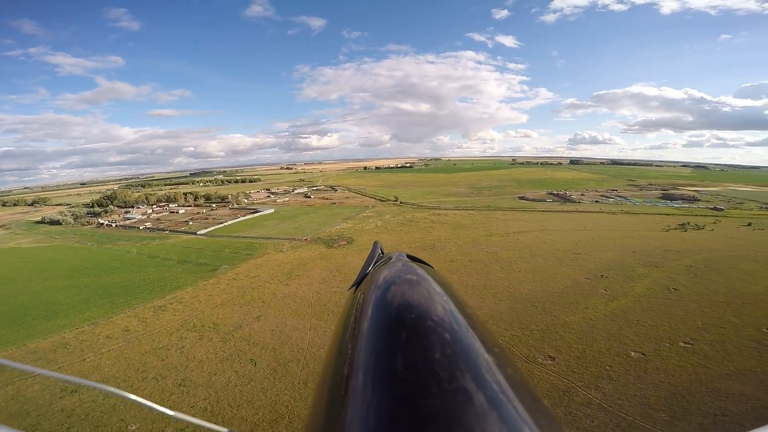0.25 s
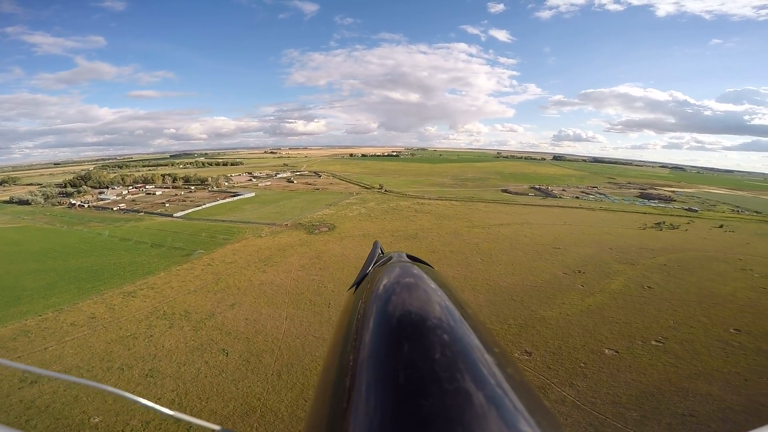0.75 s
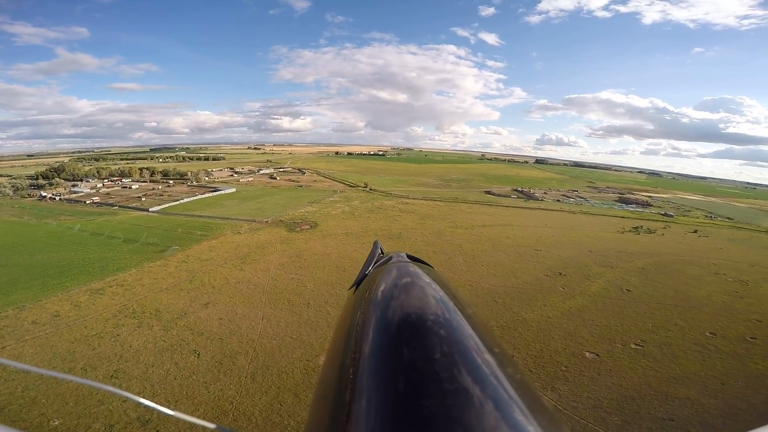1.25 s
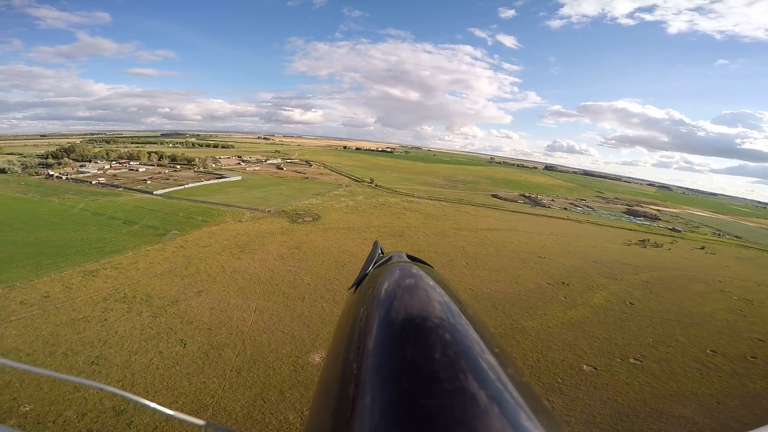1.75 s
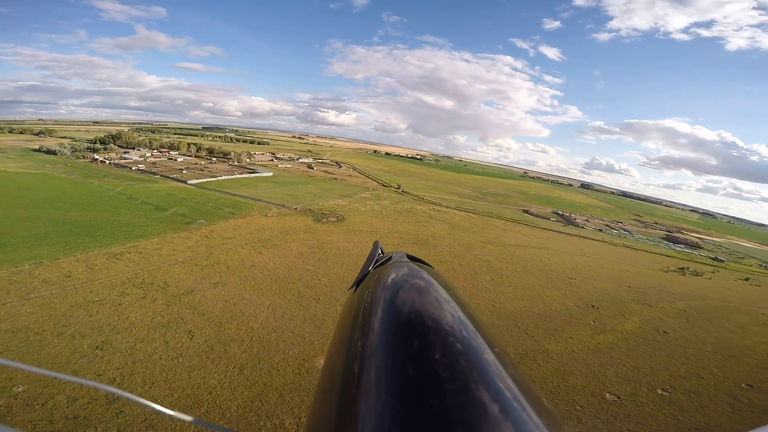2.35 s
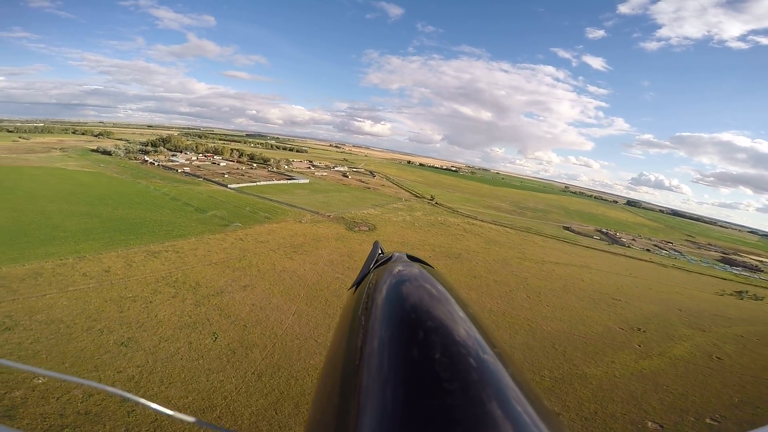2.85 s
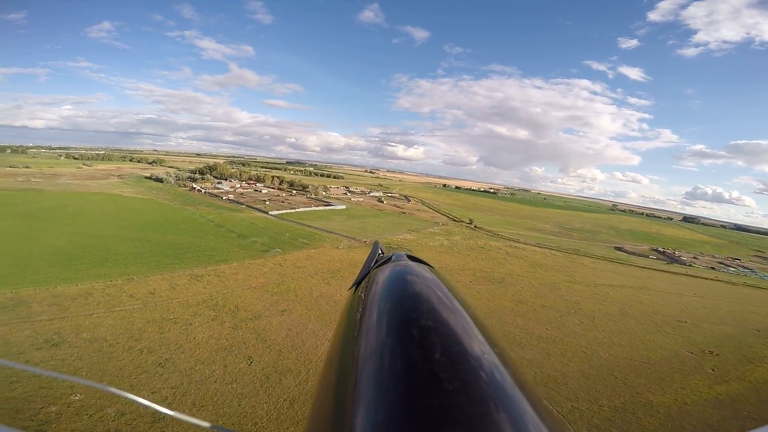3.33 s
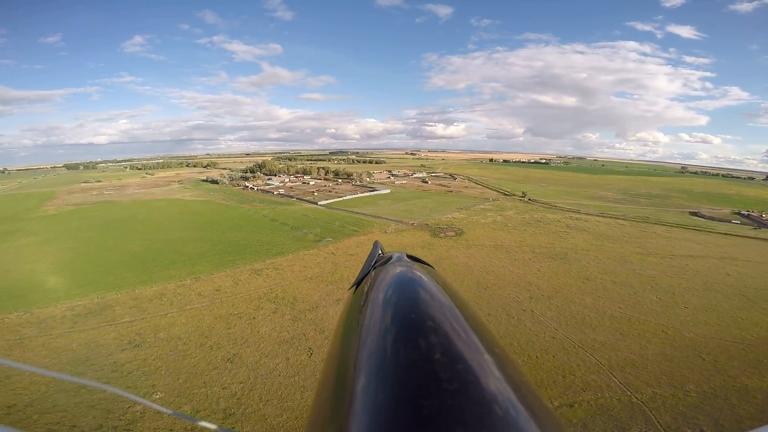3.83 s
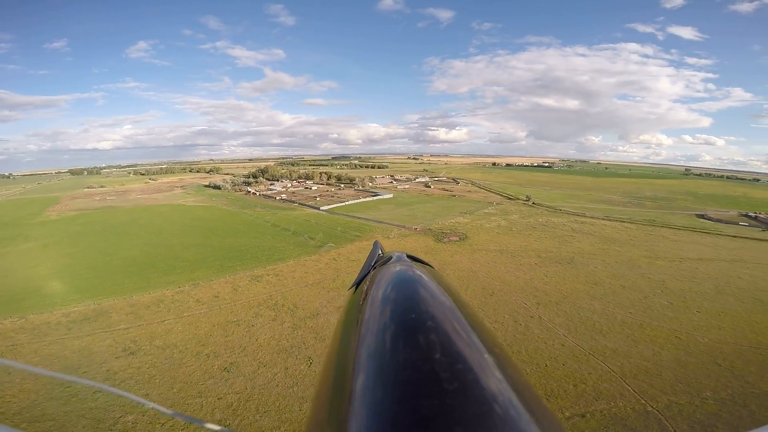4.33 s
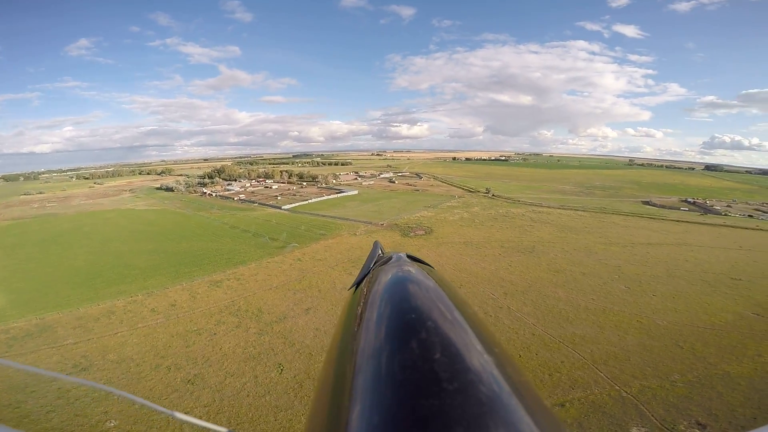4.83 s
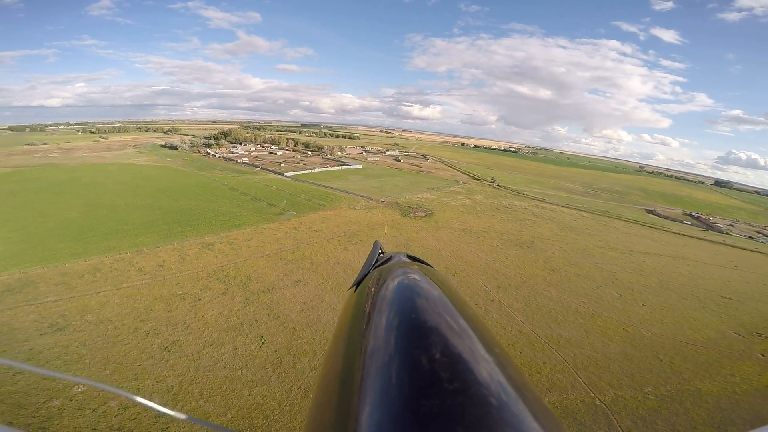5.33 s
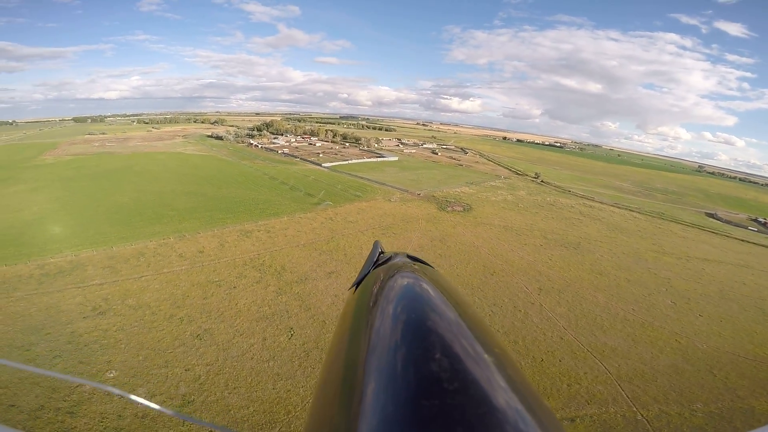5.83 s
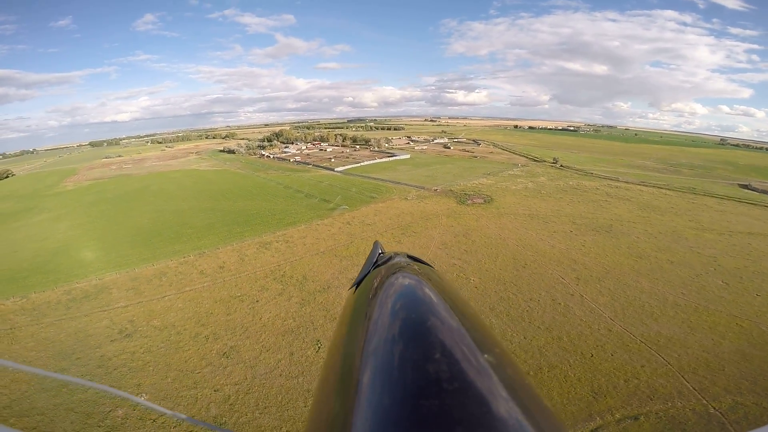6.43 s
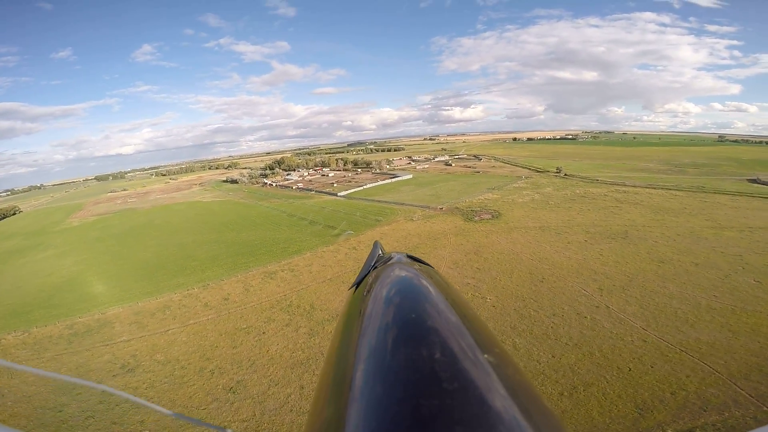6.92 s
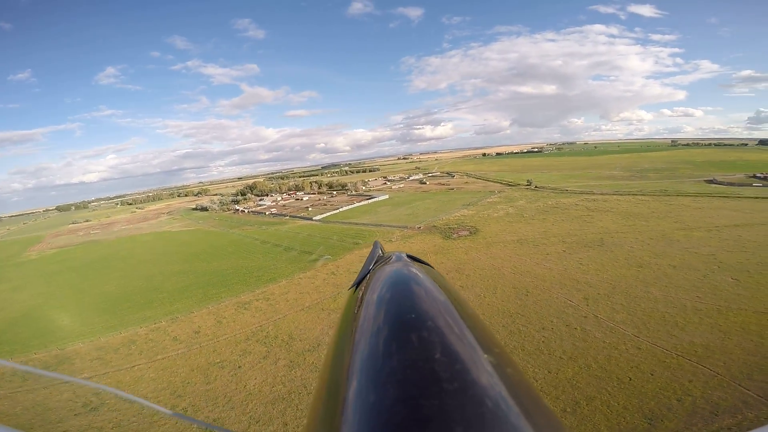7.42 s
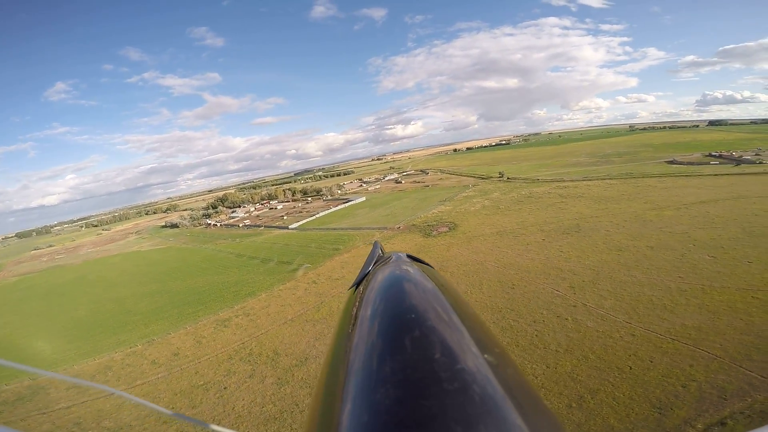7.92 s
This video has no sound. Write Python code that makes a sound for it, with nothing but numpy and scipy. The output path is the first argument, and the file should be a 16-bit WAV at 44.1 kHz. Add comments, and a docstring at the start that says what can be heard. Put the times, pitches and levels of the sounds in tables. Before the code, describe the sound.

Lurching low rumble and gusty air roar against a camera on a flying model aircraft, with fast fluttering rattles, sharp knocks and steady electric whine.

```python
"""A camera rides on a small model plane flying over fields. From the start a deep rumble shudders, lurches and
lulls, filtered noise makes the rush of air, and sines whine. Gusts of noise soon break in, and in spells the
propeller chops the flow into a fast rattle. From 0.3 s the listed eddies and a few sharp blade slaps pop on the
case as short noise bursts, with small ones at random moments throughout. The rush strengthens near 3 s, sinks
near 4 s, then grows again and is strongest at the end."""
import sys
import numpy as np
from scipy import signal
from scipy.fft import rfft, irfft
from scipy.io import wavfile

SR = 44100
rng = np.random.default_rng(int(sys.argv[2]) if len(sys.argv) > 2 else 0)


def materialize(psi):
    """Save the field psi as 16-bit PCM at rate SR to the path in sys.argv[1].

    A 1-D psi becomes a single channel; in a 2-D psi each row is a channel.
    """
    bounded = np.clip(np.atleast_2d(psi).T, -1, 1)
    quanta = np.round(bounded * 32767).astype(np.int16)
    wavfile.write(sys.argv[1], SR, quanta)


N = 360297  # length in samples
T = np.arange(N) / SR  # time in seconds
HZ = np.fft.rfftfreq(N, 1 / SR)  # every frequency of the spectrum


def amp(db):
    """Turns decibels into gain."""
    return 10 ** (np.asarray(db) / 20)


def evened(x):
    """Scales a signal to rms 1."""
    return x / np.sqrt(np.mean(np.abs(x) ** 2) + 1e-20)


def curve(rows):
    """Joins the (time, value) points of a table with straight lines."""
    s, values = np.transpose(rows)
    return np.interp(T, s, values)


def colour(points):
    """Joins the (pitch, level) points of a table into a level in dB at every frequency."""
    hz, db = np.transpose(points)
    return np.interp(np.log(HZ + 1), np.log(hz + 1), db)


def filtered(x, db):
    """Causal filter with the given gain in dB: resonances ring after a blow, never before."""
    log_gain = irfft(np.log(amp(np.maximum(db, -110))), N)
    # fold the second half onto the first, so that nothing sounds ahead of its cause
    log_gain[1:N // 2] *= 2
    log_gain[N // 2 + 1:] = 0
    return irfft(rfft(x, N) * np.exp(rfft(log_gain)), N)


def noise(db):
    """Noise of rms 1 with the given spectrum in dB."""
    return evened(irfft(rfft(rng.standard_normal(N)) * amp(db), N))


def wander(rate_hz):
    """Smooth random movement of rms 1, mostly slower than the given rate."""
    return noise(-10 * (HZ / rate_hz) ** 2)


def band(x, lo_hz, hi_hz):
    """Keeps the part of x between two soft edges."""
    below_high_edge = 1 / (1 + (HZ / hi_hz) ** 10)
    below_low_edge = 1 / (1 + (HZ / lo_hz) ** 10)
    return irfft(rfft(x) * (below_high_edge - below_low_edge), N)


def swell(t, s, length, edge=2):
    """A smooth rise and fall of height 1 around the moment s; a higher edge makes its flanks steeper."""
    return np.exp(-np.minimum(np.abs(2.05 * (t - s) / length), 10) ** edge)


# smooth airflow over the case: (start_s, base_level_db)
AIRSPEED = [(0, -41.5), (2.1, -40.5), (3.0, -35), (4.25, -42), (6.1, -38), (6.6, -33.5), (7.1, -33.5),
            (7.6, -36.5), (8.17, -33)]
# lurches that shake the airframe hard: (middle_s, length_s, rise_db)
LURCHES = [(0.884, 0.15, 2), (1.452, 0.026, 17.5), (1.54, 0.028, 9.5), (2.062, 0.049, 5), (2.33, .16, 5.5),
           (3.143, 0.056, 7), (3.519, .08, 5), (4.05, 0.042, 9), (4.441, 0.098, 0.5), (5.23, 0.043, 9.5),
           (5.589, 0.17, 6), (6.045, 0.13, 7.5), (6.362, 0.062, 9.5), (6.807, 0.41, 4.5), (7.228, 0.13, 3),
           (7.573, 0.34, 4.5), (7.966, 0.27, 4.5)]
# lulls in which the shaking dies down: (middle_s, length_s)
LULLS = [(0.007, .1), (0.673, 0.073), (1.133, 0.16), (1.859, 0.1), (2.13, 0.046), (2.591, 0.054),
         (3.013, 0.13), (3.964, 0.077), (4.192, .08), (4.637, 0.066), (5.07, 0.028), (5.476, .04),
         (6.168, 0.09), (7.06, 0.044)]


def shaking(base_db=-18.5, growth=0.19, swing_db=-2.4, swing_hz=24, lull_db=-14.5):
    """Level of the airframe's shaking in dB: it grows with airspeed, wanders, lurches and lulls."""
    speed_db = curve(AIRSPEED)
    faster_db = growth * (speed_db - speed_db.mean())  # growth is dB of shaking per dB of rush
    lurches = sum(db * swell(T, s, length) for s, length, db in LURCHES)
    lulls = lull_db * sum(swell(T, s, length) for s, length in LULLS)
    return base_db + faster_db + swing_db * wander(swing_hz) + lurches + lulls


# colour of broad pressure swings: (pitch_hz, relative_level_db)
BUFFET_COLOUR = [(7, -36), (20, 3.5), (38, 3.5), (44, -12), (74, 9.5), (89, 0), (101, 2), (138, -14),
                 (158, -12.5), (197, -27.5), (300, -35), (450, -40), (900, -72.5)]


def rumble(mode_hz=58.3, width_hz=14, steadiness=0.66, low_hz=44, high_hz=75, mode_db=-0.03,
           buffet_db=-27, follow=0.2):
    """Turbulence shakes one deep mode of the airframe; broad pressure swings rise with it."""
    shake_db = shaking()
    mode = noise(-10 * np.log10(1 + (2 * (HZ - mode_hz) / width_hz) ** 4))
    swing = evened(signal.hilbert(mode))
    # the mode's own random swells are partly evened out
    steadied = swing.real / (np.abs(swing) ** 2 + 0.26) ** (steadiness / 2)
    push = amp(shake_db + mode_db) * evened(steadied)
    # the airframe needs a few cycles to swell and die
    shudder = push.std() * evened(band(push, low_hz, high_hz))
    buffet = noise(colour(BUFFET_COLOUR)) * amp(follow * (shake_db - shake_db.mean()))
    return shudder + amp(buffet_db) * buffet


# low blast in the turbulence, before trim: (start_s, level_relative_to_body_db)
BLAST = [(0, -9), (.3, -9.5), (.8, -6), (2.0, -12), (2.75, -11.5), (3.1, -6), (3.8, -1.5), (4.6, 0.5),
         (4.75, -12.5), (5.4, -2), (6.9, -1.5), (8.17, -5)]
# gusts that tear the flow off the case, before trim:
# (middle_s, length_s, strength_db, high_hiss_relative_to_strength_db)
GUSTS = [(0.018, 0.037, -23.5, -14.5), (0.204, 0.14, -33, -23), (0.379, 0.062, -22, -18),
         (.612, 0.062, -26, -12), (.692, .05, -27, -14), (0.778, .046, -28, -27), (1.041, .06, -23, -21),
         (1.145, 0.037, -26.5, -16.5), (1.382, .06, -27, -12.5), (1.661, 0.066, -29.5, -17.5),
         (1.879, 0.065, -29.5, -22.5), (1.973, 0.051, -30.5, -20), (2.241, .05, -27, -13.5),
         (2.496, 0.093, -24.5, -21), (2.778, 0.032, -22, -11.5), (2.886, 0.067, -27, -20),
         (3.108, 0.086, -24.5, -20), (3.267, 0.059, -21, -15.5), (3.394, 0.097, -31.5, -15.5),
         (3.607, 0.055, -21.5, -20.5), (3.82, 0.22, -34, -21), (3.96, 0.093, -34.5, -11.5),
         (4.073, 0.063, -26.5, -16.5), (4.395, 0.05, -35.5, -12.5), (4.484, 0.048, -30.5, -12.5),
         (4.667, 0.1, -30, -20), (4.719, 0.053, -23, -19.5), (5.368, 0.034, -26.5, -18),
         (5.451, 0.099, -29, -16.5), (5.592, 0.087, -32, -16), (5.693, 0.057, -30, -15.5),
         (5.952, 0.085, -26.5, -16), (6.168, 0.06, -26, -15.5), (6.289, 0.041, -24.5, -17),
         (6.444, 0.057, -26.5, -23), (6.585, 0.064, -34.5, -12), (6.715, 0.05, -28, -14.5),
         (6.895, 0.06, -26, -14), (7.139, .075, -31, -10.5), (7.34, 0.041, -31, -16),
         (7.534, .067, -34.5, -16), (7.855, 0.13, -32.5, -14.5)]


def gust_levels(churn_db=-9.5, churn_swing_db=5.5, churn_hz=3.7, churn_hiss_db=-14, hiss_growth=0.55):
    """Strength over time of the gusts' low blast, body and high hiss, with random weak churning between."""
    speed_db = curve(AIRSPEED)
    t = T[::64]  # a coarse clock is enough for slow changes
    churn = amp(speed_db + churn_db + churn_swing_db * wander(churn_hz))
    body = churn[::64] ** 2
    faster_db = np.interp(t, T, speed_db - speed_db.mean())
    hiss = body * amp(churn_hiss_db + hiss_growth * faster_db) ** 2
    for s, length, db, hiss_db in GUSTS:
        power = swell(t, s, length, edge=2.76) * amp(db) ** 2
        body = body + power
        hiss = hiss + power * amp(hiss_db) ** 2
    body = np.interp(T, t, np.sqrt(body))
    hiss = np.interp(T, t, np.sqrt(hiss))
    return amp(curve(BLAST)) * body, body, hiss


def boom(boom_db=-48, growth=0.5, gust_growth=0.47):
    """Large eddies boom dully just above the rumble, following the gusts with a weak churn of its own."""
    blast_db = curve(BLAST)
    gust_db = 20 * np.log10(gust_levels()[0])
    level_db = boom_db + growth * (blast_db - blast_db.mean()) + gust_growth * (gust_db - gust_db.mean())
    return amp(level_db) * evened(band(noise(colour(BUFFET_COLOUR)), 123, 440))


# resonances and hollows of the camera case: (pitch_hz, width_hz, lift_db)
CASE = [(485, 19, 2), (971, 37, 7), (1284, 180, 4.5), (1560, 180, 2), (1920, 37, 2), (2580, 210, 5),
        (3200, 340, 5.5), (4046, 290, 6.5), (4430, 200, -4), (5230, 150, 7), (5400, 200, -7),
        (5570, 260, 6), (6230, 270, 4), (6600, 130, -1), (6760, 180, 2.5)]


def case_db():
    """The lift or cut in dB that the case gives to air noise around its resonances and hollows."""
    return sum(db / (1 + (2 * (HZ - hz) / width) ** 2) for hz, width, db in CASE)


# colour of eddies that strike the case: (pitch_hz, relative_level_db)
EDDY_COLOUR = [(200, -19.5), (380, -18.5), (480, -3.5), (900, -2), (1300, -2.5), (1650, 5), (2200, -6),
               (2750, -6), (3600, -23), (5800, -31.5), (7000, -38.5), (7900, -50), (10500, -52),
               (15000, -71.5)]


def shell_db():
    """Spectrum in dB of eddies heard through the resonant case."""
    return colour(EDDY_COLOUR) + case_db()


def ticks(per_s, spread_db):
    """Random sharp pushes of air, mostly small."""
    sizes = amp(spread_db * np.minimum(rng.exponential(1, N), 3)) * rng.choice([-1, 1], N)
    return evened(sizes * (rng.random(N) < per_s / SR))


def vortices(per_s, spread_db, low_hz=900, high_hz=3100, cycles=3, glide=0.14):
    """Small vortices pass the microphone port: each is a blip of a few cycles at one of 16 pitches."""
    age, out = np.arange(-400, 401) / SR, np.zeros(N)
    pitches = np.geomspace(low_hz, high_hz, num=16)
    for hz in pitches:
        turns = age * hz
        bend = 1 + glide * rng.uniform(-0.44, 1) * turns / cycles  # the pitch glides within the blip
        blip = np.exp(-(turns / cycles) ** 2) * np.sin(2 * np.pi * turns * bend)
        out += signal.oaconvolve(ticks(per_s / len(pitches), spread_db), blip, "same")
    return evened(out)


# spells when the propeller's wake sweeps the camera:
# (middle_s, length_s, chopped_share_added_to_the_usual, from 0 to 1)
WAKE = [(0.14, 0.32, 0.8), (0.656, .3, .4), (1.523, 0.92, 0.65), (2.328, 0.16, 1), (3.8, 0.25, 0.5),
        (4.543, 0.16, 0.98), (7.932, 0.66, 0.35)]


def propeller(blades_hz=90.9, usual=0.16, sharpness=3, uneven_db=2.0, limp_db=3.1):
    """Each passing blade slaps the flow, every other one harder; gives the chopped share and the slaps."""
    spells = sum(part * swell(T, s, length) for s, length, part in WAKE)
    share = np.clip(usual + spells, 0, .95)
    turns = blades_hz * T
    blade = turns.astype(int)  # number of the passing blade
    chance = np.clip(rng.standard_normal(blade[-1] + 1), -2, 2)[blade]
    sizes = amp(uneven_db * chance + limp_db * (-1) ** blade)
    return share, evened(sizes * np.exp(-sharpness * np.cos(2 * np.pi * turns)))


# colour of the smooth rush: (pitch_hz, relative_level_db)
RUSH_COLOUR = [(200, 1), (380, -10.5), (700, 1), (1200, -3), (1750, 10.5), (2300, 1.5), (3200, 2.5),
               (3740, -2.5), (3900, -8.5), (4200, -19.5), (4400, -6), (4700, -25), (6100, -28.5),
               (7200, -28.5), (9000, -39)]


def rush(share, slaps, rush_db=-0.68, flutter_db=2.1, ring=0.25, stray_db=-10, rattle_db=2):
    """Attached flow rushes over the case; stray vortices flutter in it and the blades' vortices rattle."""
    even_rush = noise(colour(RUSH_COLOUR) + ring * case_db())  # ring: share of the case's lift
    smooth = amp(rush_db + flutter_db * wander(110)) * even_rush
    stray = evened(filtered(vortices(per_s=39, spread_db=1, low_hz=1390), shell_db()))
    rattle = share * evened(filtered(slaps * rng.standard_normal(N), shell_db()))
    return amp(curve(AIRSPEED)) * (smooth + amp(stray_db) * stray + amp(rattle_db) * rattle)


# partials of the whine: (multiple_of_base_pitch, peak_level_db before flicker)
WHINE = [(1, -32.5), (2, -51), (4, -80), (5, -85.5), (6, -96), (7, -92), (8, -92)]


def whine(base_hz=1602.6, waver=0.00063, flicker_db=-0.4):
    """A nearly steady electric whine: sines at multiples of one pitch, with slight waver and flicker."""
    turns = np.cumsum(base_hz * (1 + waver * wander(28))) / SR
    partials = sum(amp(db) * np.sin(2 * np.pi * k * turns) for k, db in WHINE)
    return amp(flicker_db * wander(48)) * partials


def patchy(x, patchy_db, patch_s, patch_hz):
    """Each eddy has its own size, so random patches in time and pitch grow louder or softer."""
    z = signal.stft(x, nperseg=256, noverlap=192)[2]
    chance = rng.standard_normal(z.shape)
    over_time = signal.windows.gaussian(41, patch_s * SR / 64)
    over_pitch = signal.windows.gaussian(41, patch_hz * 256 / SR)
    patches = evened(signal.fftconvolve(chance, np.outer(over_pitch, over_time), "same"))
    return signal.istft(z * amp(patchy_db * patches), nperseg=256, noverlap=192)[1][:N]


def gusts(share, slaps, clump_db=0.54, flutter_db=2.4, tick_db=-9, vortex_db=-3, blast_db=-1.5,
          body_db=-1.13, hiss_db=-1.3, dulling=0.48, fizz_db=-43, chopped=0.4):
    """Separated flow: each gust swells and fades as clumps of tiny eddies rattle the case."""
    blast, body, hiss = gust_levels()
    fluttering = evened(rng.standard_normal(N) * amp(flutter_db * wander(190)))
    eddies = fluttering + amp(tick_db) * ticks(per_s=400, spread_db=5)
    eddies = patchy(eddies, patchy_db=3.0, patch_s=0.0039, patch_hz=239)
    fine = evened(filtered(eddies, shell_db()))
    coarse = evened(filtered(vortices(per_s=420, spread_db=5.5), shell_db()))
    air = (fine + amp(vortex_db) * coarse) * amp(clump_db * wander(140))
    # large eddies blast low and hiss dully; small ones hiss bright
    brightness = np.clip(0.43 * body / blast, .3, 2) ** dulling
    spray_air = evened(band(air, 4190, 5100) + brightness * band(air, 5900, 6830))
    spray = amp(hiss_db) * hiss * spray_air
    low = amp(blast_db) * blast * evened(band(air, 290, 1477))
    middle = amp(body_db) * body * evened(band(air, 1467, 4040))
    fizz = amp(fizz_db) * body * evened(band(air, 8100, 15000))
    # the blades chop large eddies more than the fine spray
    chop = np.sqrt(1 + chopped * share * (slaps ** 2 - 1))
    return chop * (low + middle) + np.sqrt(chop) * spray + fizz


def small_pops(count, pop_db=-23.5, thud_db=-12, spread_db=-2.5):
    """Small eddies strike at random moments: rows like those of POPS."""
    when, size, thud = rng.random((count, 3)).T
    pop_levels = pop_db + spread_db * (2 * size - 1)
    thud_levels = thud_db + spread_db * (2 * thud - 1)
    return np.transpose([when * T[-1], pop_levels, thud_levels])


def puffs(times, sizes_db, rise_s, fall_s):
    """Pressure of puffs that swell quickly and die away."""
    age, pressure = T[:SR // 10], np.zeros(N)
    shape = (1 - np.exp(-age / rise_s)) * np.exp(-age / fall_s)
    for s, db in zip(times, sizes_db):
        part = pressure[round(s * SR):][:len(shape)]  # a view: adding here fills pressure
        part += amp(db) * shape[:len(part)] / shape.max()
    return pressure


# large eddies that hit the case, with a few sharp propeller blade slaps (0.302, 0.601, 6.154 and 7.872 s),
# before trim: (start_s, crack_level_db, low_thud_relative_to_crack_db)
POPS = [(0.302, -20, -28), (0.35, -13.5, -15), (0.478, -16.5, -13), (0.601, -19, -16), (1.017, -17.5, -14),
        (1.237, -20.5, -33), (1.27, -21.5, -27), (2.757, -18, -16), (3.106, -21, -16), (3.254, -25, 1),
        (3.571, -21, 2), (3.821, -20, -0.5), (4.142, -20, -4), (4.469, -25, 6), (4.904, -18.5, -6.5),
        (5.429, -22.5, 6.5), (5.934, -10, -22), (6.154, -29, -13), (6.696, -20, -11), (6.9, -19, 0.5),
        (7.321, -26, -13), (7.617, -19, -34), (7.66, -12, -7), (7.872, -12, -25)]


def pops(pop_db=-6, thud_db=-6, tilt_db=-1, thump_db=-15):
    """A single eddy or blade slap cracks on the case; its low thud comes and goes more slowly, and a dull thump
    lingers."""
    s, db, low_db = np.vstack([POPS, small_pops(count=22)]).T
    crack = puffs(s, db + pop_db, rise_s=.001, fall_s=.0035)
    thud = puffs(s, db + low_db + thud_db, rise_s=.003, fall_s=.005)
    thump = puffs(s, db + low_db + thump_db, rise_s=.004, fall_s=.02)
    air = noise(shell_db() + tilt_db * np.log2(1 + HZ / 3000))  # the tilt softens the treble
    bright = evened(band(air, 1200, 15000))
    low = evened(band(air, 660, 1300))
    deep = evened(band(noise(colour(BUFFET_COLOUR)), 130, 570))
    return crack * bright + thud * low + thump * deep


def scene():
    """Adds everything that reaches the one microphone."""
    share, slaps = propeller()
    air = rush(share, slaps) + gusts(share, slaps) + pops()
    return (rumble() + boom() + air + whine())[None]


# colour of the microphone's hiss: (pitch_hz, relative_level_db)
HISS_COLOUR = [(3000, 7), (8500, 1.5), (9700, 8), (11500, -1), (14500, -3.5), (16000, -9.5)]


def record(dry, hiss_db=-70, edge_hz=15300):
    """Adds the microphone's own hiss, then cuts everything above the band limit."""
    wet = dry + amp(hiss_db) * noise(colour(HISS_COLOUR))
    limit = signal.firwin(511, edge_hz, window=("kaiser", 9), fs=SR)
    return signal.oaconvolve(wet, limit[None], "same")


dry = scene()
out = record(dry)
materialize(out)
```